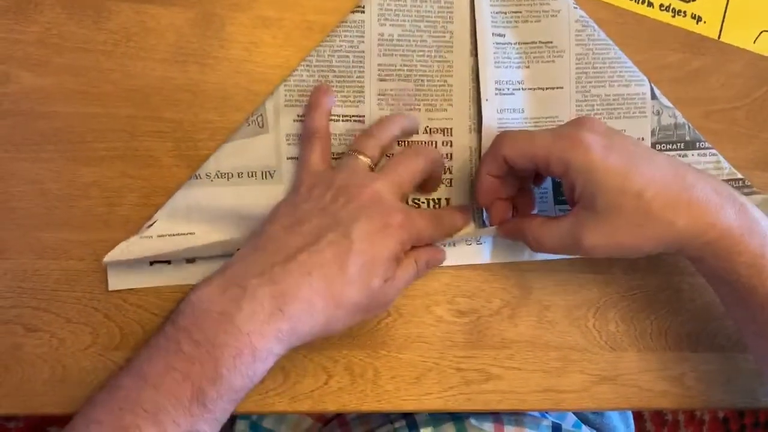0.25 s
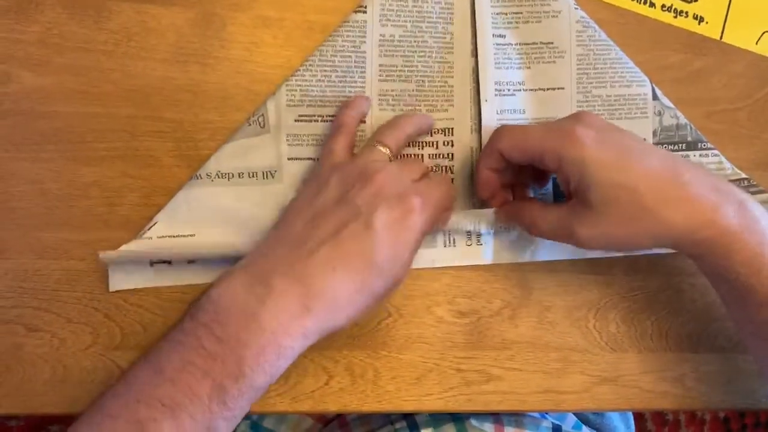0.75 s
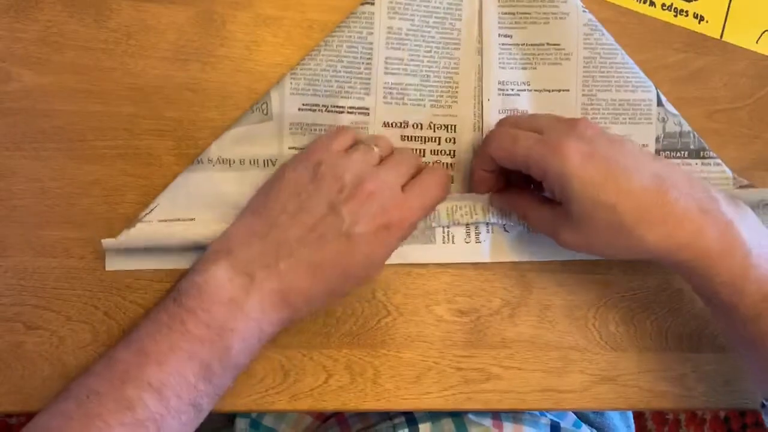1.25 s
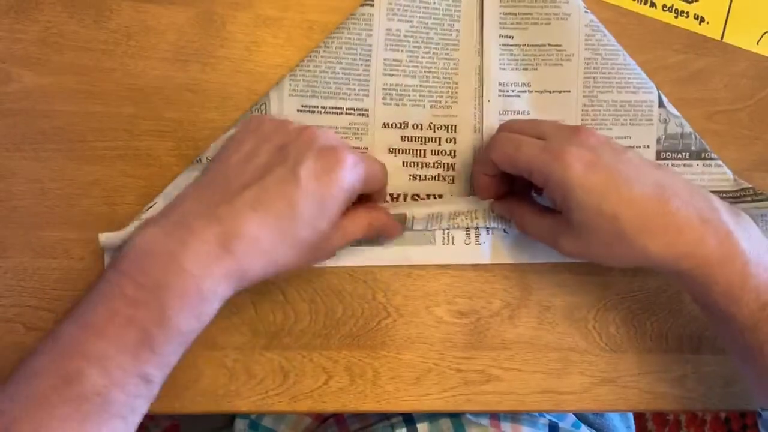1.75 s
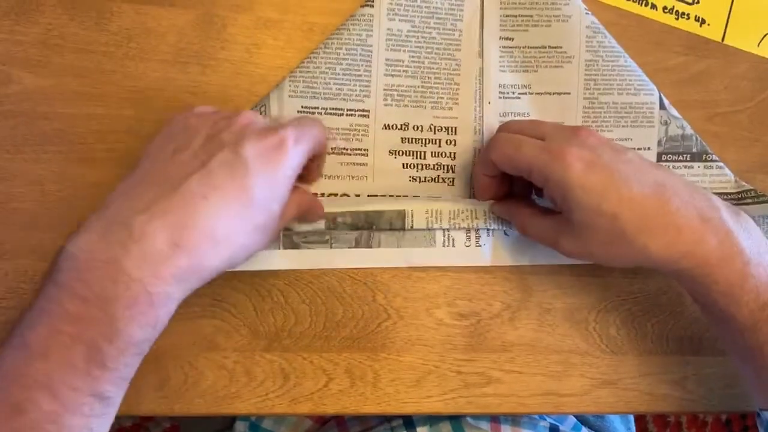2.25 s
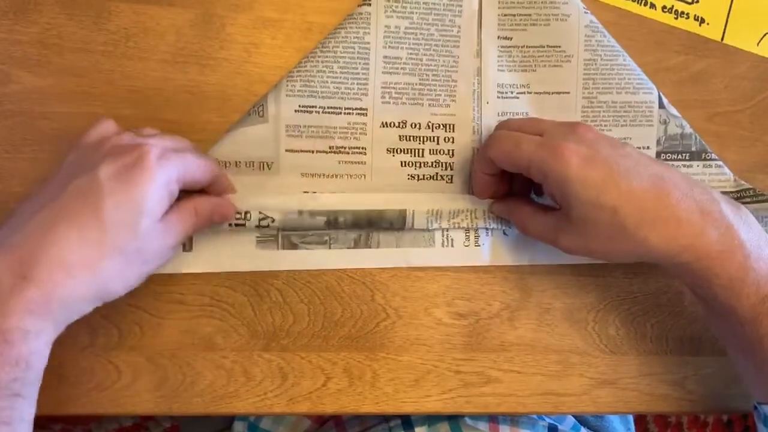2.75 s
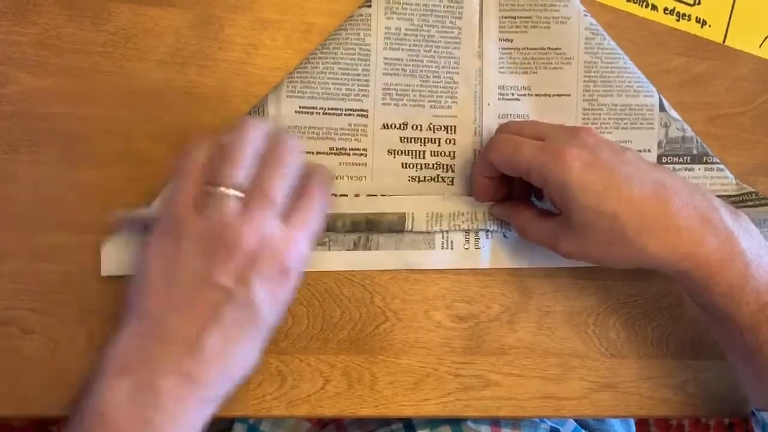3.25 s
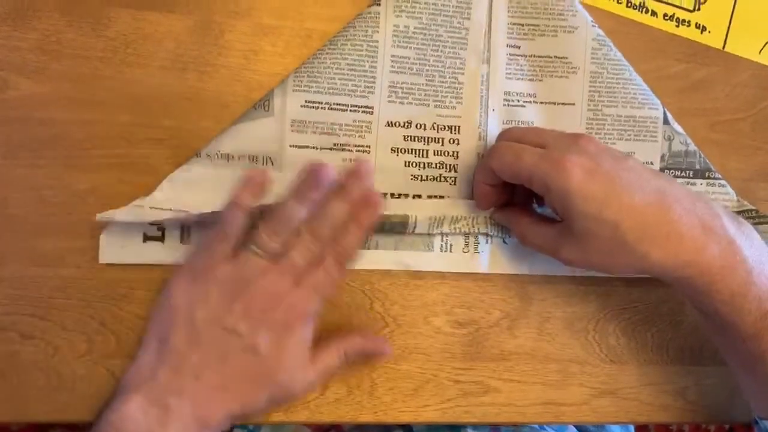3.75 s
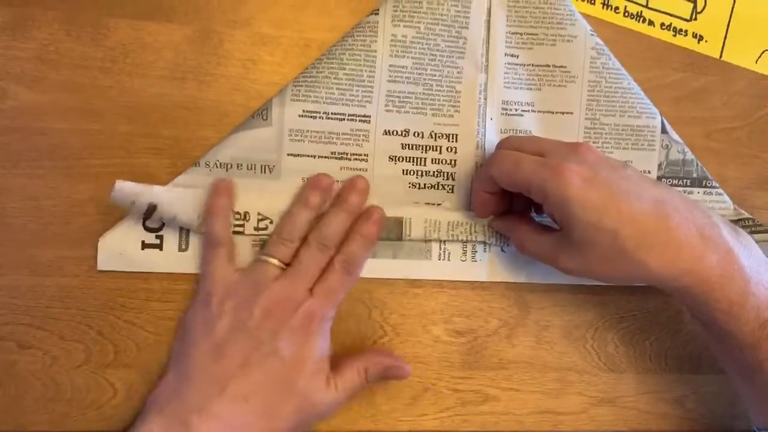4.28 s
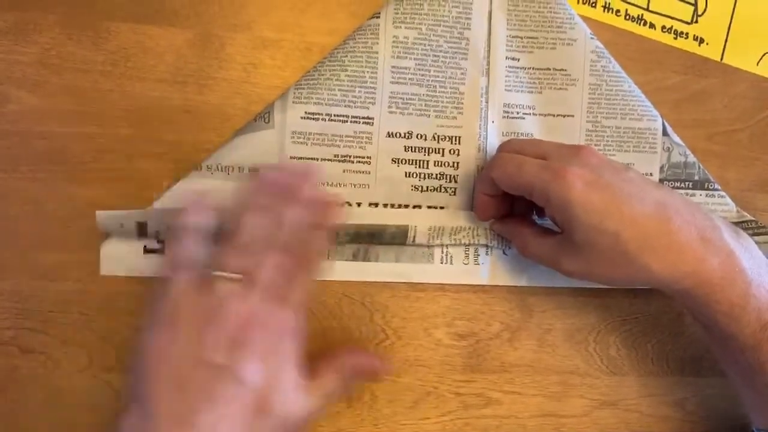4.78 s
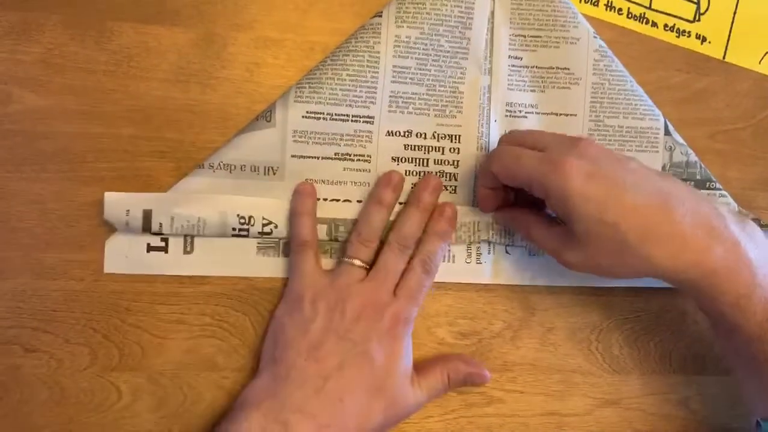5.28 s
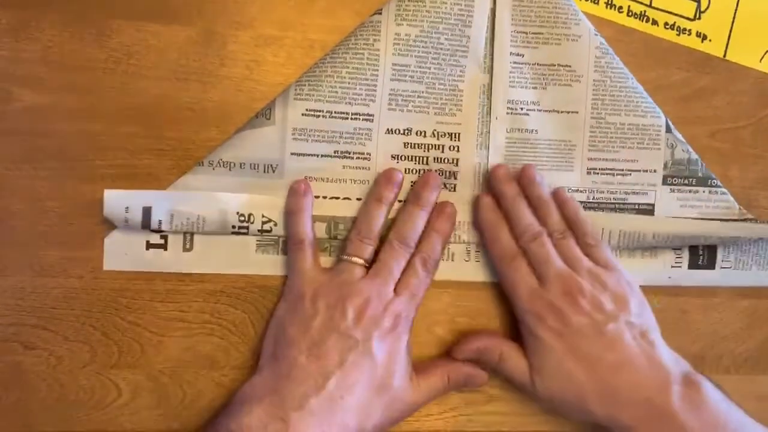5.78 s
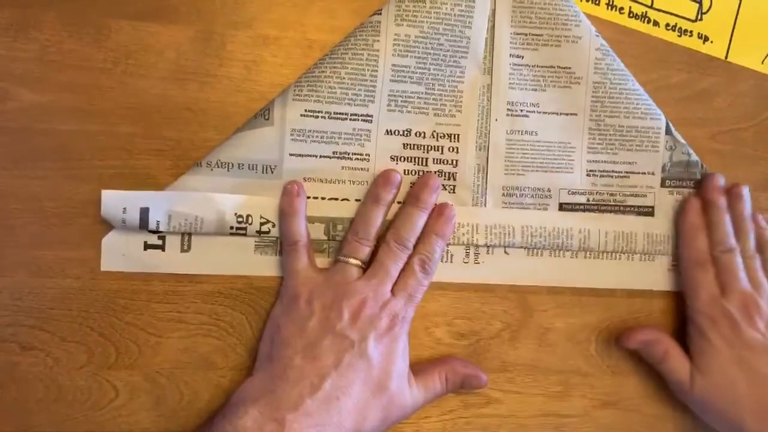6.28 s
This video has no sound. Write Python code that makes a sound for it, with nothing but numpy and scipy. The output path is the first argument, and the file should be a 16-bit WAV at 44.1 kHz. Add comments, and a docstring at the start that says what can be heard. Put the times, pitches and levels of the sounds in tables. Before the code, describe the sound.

Close stereo sound of newsprint being handled in a small quiet room: dry crackles, short fibrous rubs and small hollow papery knocks as an edge is rolled, a brief lull, sharp bright crinkles, then flat-hand swishes as the fold is smoothed. Soft dull bumps come from the tabletop. Beneath everything runs a faint low hum that swells slightly and dips.

```python
"""Folded newspaper: two hands roll up its edge and press it flat on a wooden table.
Buckles are short kinks of noise; sliding is random fibre slips in three bands; folds ring as narrow notes.
Fingers thud on the table. A wavering sine hums and noise gives still air in a small room.
A close microphone pair hears it all with phase, balance and stray differences."""
import sys
import numpy as np
from scipy import signal
from scipy.fft import rfft, irfft, next_fast_len
from scipy.io import wavfile
from scipy.ndimage import uniform_filter1d

SR = 44100
rng = np.random.default_rng(int(sys.argv[2]) if len(sys.argv) > 2 else 0)


def put_to_file(sound):
    """Save the sound as 16-bit audio at rate SR, in the file named by the first command-line argument."""
    columns = np.atleast_2d(sound).T  # one column per channel
    safe = np.clip(columns, -1, 1)
    whole_steps = np.round(safe * 32767)
    wavfile.write(sys.argv[1], SR, whole_steps.astype(np.int16))


N = 287833
TIME = np.arange(N) / SR
SPAN = next_fast_len(N, True)
HZ = np.fft.rfftfreq(SPAN, 1 / SR)

# Single buckles. Each row: time in seconds, level in dB over 4 ms before trim, treble over mids in dB.
SNAPS = [(.147, -47.5, 2), (.224, -43.5, 5), (.291, -50, 12), (0.4682, -39, 16), (.523, -33.5, -2),
         (.53, -40, -1), (.5755, -26, 7), (.591, -35, -1), (.713, -42, -20), (.723, -37, -11),
         (.731, -39, -1), (.755, -35, 2), (.7833, -39, -1), (.8514, -40.5, -5), (0.8869, -34.5, 13),
         (0.9123, -36.5, 0), (.971, -42.5, -1), (.999, -27.5, 4), (1.023, -31.5, 4), (1.0399, -32.5, 3),
         (1.0853, -31.5, -7), (1.0913, -30, 5), (1.2468, -25.5, 10.5), (1.259, -39, 7), (1.3155, -34, -6),
         (1.322, -41, -14), (1.3394, -27.5, -12.5), (1.3688, -30.5, -3), (1.4194, -37, -1),
         (1.503, -41, -3), (1.591, -31.5, -2), (1.616, -40, 10), (1.6862, -30.5, 7.5), (1.7406, -38, -6),
         (1.7827, -31.5, 7), (1.8, -42, 2), (1.894, -42.5, 7), (1.928, -43.5, 4), (1.9731, -40, 3.5),
         (2.0336, -35.5, -11), (2.079, -42, -5), (2.221, -48, 17), (2.2309, -32.5, 7.5),
         (2.2716, -38.5, -3), (2.3162, -28, 6), (2.34, -40, 4), (2.4534, -28.3, 11), (2.581, -45, 7),
         (2.8221, -42, 3), (2.854, -45.5, -1), (2.8936, -47, -13), (2.9229, -44, 4), (3.2511, -40.5, -1),
         (3.269, -41, 5), (3.399, -24.5, 13), (3.4108, -35, -4), (3.461, -26, 9), (3.4928, -31.5, 9),
         (3.625, -38, 0.5), (3.983, -36, 2), (4.0058, -33.5, 10.5), (4.107, -43.5, -3), (4.176, -29.5, 7),
         (4.183, -36.5, 13), (4.272, -41, 14), (4.2844, -38, 8), (4.3375, -35, 15.5), (4.37, -39, 14),
         (4.693, -57, 0), (4.9499, -39, -10), (5.0263, -43.5, -15), (5.055, -43.5, -12),
         (5.1025, -33.5, 3.5), (5.136, -44, 2), (5.2548, -41.5, -5), (5.311, -39, 8), (5.608, -36.5, 5),
         (5.901, -45, -10), (5.933, -41.5, -2), (5.984, -41.5, 3), (6.001, -40.5, 1), (6.019, -40, -7),
         (6.05, -37.5, 1), (6.0596, -39.5, 0), (6.067, -40, 1), (6.087, -39, -4), (6.182, -40.5, 8),
         (6.203, -41.5, 6), (6.2947, -35.5, 13.5), (6.4836, -42, -3), (6.493, -45, 0)]
# Crushed creases. Each row: start in seconds, length in seconds, level in dB, treble over mids in dB.
CRUNCHES = [(2.513, .008, -39, -13), (3.944, .012, -38.5, 4), (4.59, .03, -55, -10), (4.9235, .028, -37, 3),
            (4.95, .014, -40.5, -15), (5.332, .013, -47, 9), (5.579, .005, -37.5, 6)]
# Finger pushes. Each row: start in seconds, length in seconds, rustle in dB before trim,
# fibre hiss in dB re rustle.
PUSHES = [(0, 0.041, -50.5, .5), (0.107, .08, -60.5, 1), (0.199, 0.041, -51.5, 8.5), (.26, .08, -61.5, -1),
          (0.354, 0.12, -51.5, 3.5), (0.477, .075, -48, 3.5), (.568, .066, -43.5, 3),
          (0.688, .11, -52.5, -2.5), (0.851, .1, -53, 0), (0.949, 0.096, -48, 2.5), (1.088, .135, -51.5, 5),
          (1.239, .13, -46.5, .5), (1.393, .075, -53, 1), (1.488, 0.052, -49.5, 2.5),
          (1.584, 0.16, -54, 2.5), (1.74, 0.19, -50.5, .5), (1.994, .3, -52, 4), (2.311, 0.058, -48.5, 3),
          (2.451, 0.079, -55.5, 5), (2.589, 0.15, -55, 3), (2.785, 0.062, -54, 2),
          (2.921, .008, -56.5, 0.5), (2.994, .047, -57.5, 2.5), (3.141, .08, -62, 3.5),
          (3.252, .008, -45.5, 1.5), (3.289, .095, -52.5, 6), (3.401, .11, -48.5, 4),
          (3.593, 0.032, -53.5, 1.5), (5.096, 0.017, -55, 0.5), (5.16, .04, -65, -2), (5.26, 0.022, -54, 0),
          (5.327, .02, -55, 3.5), (6.311, 0.052, -59.5, 1.5), (6.501, .035, -58, 1)]
# Flat-hand sweeps. Each row: start, fastest point and end in seconds, rustle when fastest in dB
# before trim, fibre hiss in dB re rustle.
SWEEPS = [(3.902, 3.945, 3.98, -58, 2.5), (3.98, 4.144, 4.17, -55.5, 6.5), (4.168, 4.278, 4.57, -54, 10.5),
          (4.581, 4.6, 4.82, -67, -0.5), (4.9, 4.95, 5.0, -53, 1), (5.545, 5.58, 5.69, -53.5, 2),
          (5.708, 6.087, 6.29, -50, 3)]
# Loose sheet bending as a hand shifts its hold. Each row: start in seconds, length in seconds,
# level in dB before trim.
BENDS = [(0, 0.08, -53.5), (0.122, 0.11, -60.5), (.438, 0.1, -53), (.69, .16, -54), (1.085, .02, -52),
         (1.89, 0.09, -57), (2.515, .01, -53), (2.937, 0.0092, -60), (3.06, .06, -64.5), (3.47, 0.077, -54),
         (3.94, .06, -58), (4.13, 0.035, -58), (4.945, 0.06, -58), (5.254, .07, -60), (5.56, .05, -64),
         (6.159, 0.05, -56), (6.505, .02, -56)]
# Tube note of the rolled edge. Each row: time in seconds, pitch in Hz, level in dB re driving rustle.
ROLL = [(0, 1450, -4), (1.35, 1480, -1), (2.2, 1600, -16), (4.75, 1850, -8)]
# Closing air pockets. Each row: time in seconds, level in dB, pitch in Hz, t60 in seconds.
POCKETS = [(.755, -55, 566, 0.11), (.853, -55.5, 556, .08), (1.086, -44, 1420, 0.1), (1.34, -45, 1530, .1),
           (2.518, -39, 1017, .018), (3.4, -42.5, 1420, .16), (3.4615, -41.5, 1534, .06)]
# Heavy finger and palm landings. Each row: time in seconds, level in dB before trim.
BUMPS = [(.199, -45.5), (.358, -55), (.426, -54.5), (0.554, -54.5), (.66, -56), (1.09, -56.5), (1.217, -54),
         (2.612, -56.5), (3.253, -56), (3.495, -57), (4.13, -59.5), (4.945, -55), (5.31, -55.5),
         (6.157, -56)]
# Spectral shapes of buckle, slide, table and air. Each row: frequency in Hz, relative density in dB.
SNAP_COLOUR = [(100, -23), (400, -15), (750, -12.5), (1100, -8), (1500, -1), (2300, -4), (3500, 2),
               (5000, 2), (7500, -3.5), (9000, -5.5), (13000, -7.5), (16000, -13)]
SLIDE_COLOUR = [(80, -9.5), (180, -3.5), (320, 2), (500, -6), (780, -4.5), (1100, -2), (1500, -2),
                (2400, 0.5), (3400, 3.5), (5000, -0.5), (7600, -2.5), (8500, -6), (12500, -4.5),
                (16000, -11.5)]
TABLE_COLOUR = [(28, -42.5), (55, -14.5), (85, -1.5), (140, 0.5), (200, -11), (350, -19.5), (700, -36.5),
                (2000, -65.5)]
AIR_COLOUR = [(20, -24), (45, -4), (75, 2.5), (150, -1.5), (280, -9), (420, -22.5), (1000, -27.5),
              (2000, -32.5), (5000, -33.5), (16000, -42.5)]
# Machine tones. Each row: frequency in Hz, level in dB before swell.
HUM = [(108.8, -57)]
# Hum swell. Each row: time in seconds, level change in dB.
HUM_SWELL = [(0, 0), (1.45, -1), (1.7, -10.5), (1.9, 0), (2.9, -3), (3.3, 1.5), (5.7, -1.5), (6.1, 3.5),
             (6.53, 1)]
# Room decay. Each row: frequency in Hz, t60 in seconds.
ROOM_T60 = [(200, 0.6), (800, 0.43), (2000, 0.34), (6000, 0.26), (15000, 0.02)]
# Room echo. Each row: frequency in Hz, level in dB re direct sound.
ROOM_WET = [(150, -11), (500, -.5), (1400, -5.5), (2500, -7.5), (5000, -19), (15000, -22)]
# Microphone phase. Each row: frequency in Hz, lead of left in radians.
PORT_PHASE = [(0, 0), (350, 0), (550, -1.4), (850, -1.7), (1050, .5), (1700, .4), (2600, 1.9), (3400, 1.3),
              (4750, 3.14), (6400, 6.1), (7500, 6.7), (8950, 9.42), (10400, 12.1), (11600, 12.8),
              (12500, 15), (13300, 15.7), (14600, 18.6), (16500, 19.4)]
# Microphone balance. Each row: frequency in Hz, left over right in dB.
PORT_BALANCE = [(100, -0.9), (400, -1), (900, -4), (1700, -1), (2400, -1.5), (3100, 0), (16000, 0)]
# Sound straying between microphones. Each row: frequency in Hz, amplitude share 0-1.
PORT_SPREAD = [(170, .03), (500, .42), (780, .3), (1000, .6), (1500, .15), (2400, .4), (4700, .1),
               (7000, .2)]

# A push grips quickly, eases off, then lets go; the bent sheet settles more slowly.
PUSH_RISE_DB_PER_S, PUSH_SAG_DB_PER_S, PUSH_FALL_DB_PER_S = 600.5, 11.5, 350.5
FLEX_FALL_DB_PER_S = 201
# Flexing re a push of level FLEX_FULL_DB, and its growth in dB per dB of push.
FLEX_RE_RUSTLE_DB, FLEX_FULL_DB, FLEX_GROWTH = -9, -51.5, 0.78
SWEEP_ENDS_DB, SWEEP_FLEX_DB = -4.5, -19  # slower at both ends; pressed paper hardly flexes
PRESSED_EVENS = .8  # smoothing under a flat hand, 0-1
TOUCH_DB = -69.5  # light touch at every push, before trim
AIR_DB = -69.5  # part common to both channels
EDGE_HZ = 15900


def snap(bright_db, rise_s=.0005, ring_s=0.001, flutter=0.5, tail_db=-18, tail_s=0.0077, neutral_db=2,
         facet_hz=(1400, 3800), facet_db=7, facet_width=0.14, size=2048):
    """One buckle: the sheet starts to give, kinks sharply, and a facet by the kink favours its own band."""
    t = np.arange(size) / SR - rise_s
    hz = np.fft.rfftfreq(size, 1 / SR)
    dying = np.exp(-abs(t) / ring_s) + gain_of(tail_db) * np.exp(-abs(t) / tail_s)
    onset = np.minimum(1 + t / rise_s, 1) ** 2
    kink = flutter * rng.standard_normal(size) * dying * onset
    kink[np.argmin(abs(t))] += rng.choice([-1, 1])
    tilt = read([(1900, -0.55), (9500, 0.55)], hz)
    pitch_hz = facet_hz[0] * (facet_hz[1] / facet_hz[0]) ** rng.random()
    facet = facet_db / (1 + ((hz / pitch_hz - 1) / facet_width) ** 2)
    colour_db = read(SNAP_COLOUR, hz) + (bright_db - neutral_db) * tilt + facet
    sound = irfft(rfft(kink) * causal(colour_db))
    return sound / np.sqrt(np.sum(sound ** 2) / (.004 * SR))  # energy of rms 1 over 4 ms


def snaps(level_db=-0.1, lead_s=.0005):
    """Buckles that stand out from the rustle, one by one."""
    out = np.zeros(N)
    for s, db, bright_db in SNAPS:
        add(out, s - lead_s, gain_of(db + level_db) * snap(bright_db))
    return out


def crunches(kinks_per_s=900, spread_db=4, level_db=0.0, lead_s=.0003):
    """A crease is crushed: kinks give way in close succession."""
    out = np.zeros(N)
    for start, length_s, db, bright_db in CRUNCHES:
        kinks = max(round(length_s * kinks_per_s), 2)
        burst = np.zeros(round(length_s * SR) + 2048)
        for k, (late, strength) in enumerate(rng.random((kinks, 2))):
            kink = gain_of(spread_db * (2 * strength - 1)) * snap(bright_db)
            add(burst, (k + late) * length_s / kinks, kink)
        rms = np.sqrt(np.sum(burst ** 2) / (length_s * SR))
        add(out, start - lead_s, gain_of(db + level_db) * burst / rms)
    return out


def gesture(start, length_s, fall_db_per_s):
    """Level in dB of one finger movement: attack, sagging hold, release."""
    t = TIME - start
    attack = PUSH_RISE_DB_PER_S * np.minimum(t, 0)
    sag = PUSH_SAG_DB_PER_S * np.clip(t, 0, length_s)
    return attack - sag - fall_db_per_s * np.maximum(t - length_s, 0)


def pressed():
    """Smoothing at every instant: 0 for loose paper, PRESSED_EVENS under a flat hand."""
    under_hand = sum((TIME > start) & (TIME < end) for start, _, end, _, _ in SWEEPS)
    return np.clip(PRESSED_EVENS * uniform_filter1d(under_hand.astype(float), size=1024), 0, 1)


def slide_levels(rest_db=-91):
    """Levels in dB of flexing, rustle and hiss at every instant: the strongest movement leads."""
    flex, rustle, hiss = np.full((3, N), float(rest_db))
    for start, length_s, db, hiss_db in PUSHES:
        push = db + gesture(start, length_s, PUSH_FALL_DB_PER_S)
        bend_db = FLEX_FULL_DB + FLEX_RE_RUSTLE_DB + FLEX_GROWTH * (db - FLEX_FULL_DB)
        flex = np.maximum(flex, bend_db + gesture(start, length_s, FLEX_FALL_DB_PER_S))
        rustle = np.maximum(rustle, push)
        hiss = np.maximum(hiss, push + hiss_db)
    for start, fastest, end, db, hiss_db in SWEEPS:
        rise = PUSH_RISE_DB_PER_S * np.minimum(TIME - start, 0)
        fall = PUSH_FALL_DB_PER_S * np.maximum(TIME - end, 0)
        speed_db = np.interp(TIME, [start, fastest, end], [SWEEP_ENDS_DB, 0, SWEEP_ENDS_DB])
        sweep = db + speed_db + rise - fall
        flex = np.maximum(flex, sweep + SWEEP_FLEX_DB)
        rustle = np.maximum(rustle, sweep)
        hiss = np.maximum(hiss, sweep + hiss_db)
    for start, length_s, db in BENDS:
        flex = np.maximum(flex, db + gesture(start, length_s, FLEX_FALL_DB_PER_S))
    return flex, rustle, hiss


def slide(levels, flex_db=-4.5, rustle_db=-4.3, hiss_db=-2.8, slips_per_s=4000, spread_db=3.5,
          judder_db=2.0, patchy_db=(2.3, 1.6, 1.1), ripple_db=3.5):
    """Fibres catch and slip thousands of times a second, unequally hard, and shake the sheet."""
    struck = rng.random(N) < slips_per_s / SR
    strength_db = spread_db * np.minimum(rng.exponential(1, N), 4)
    slips = struck * rng.choice([-1, 1], N) * gain_of(strength_db)
    loose = 1 - pressed()  # under a flat hand the slips merge into an even swish
    rough = loose * evened(slips + 0.25 * rng.standard_normal(N))
    swish = np.sqrt(1 - loose ** 2) * rng.standard_normal(N)
    drive = (rough + swish) * gain_of(judder_db * loose * wander(70))
    spectrum = rfft(rippled(drive, ripple_db), SPAN) * gain_of(read(SLIDE_COLOUR, HZ))
    above_flex = read([(800, 0.029), (1450, 0.97)], HZ)
    above_rustle = read([(3600, 0.08), (6000, 0.93)], HZ)
    shares = 1 - above_flex, above_flex - above_rustle, above_rustle
    out = np.zeros(N)
    for share, level, db, uneven_db in zip(shares, levels, (flex_db, rustle_db, hiss_db), patchy_db):
        band = evened(irfft(spectrum * share, SPAN)[:N])
        out += band * gain_of(level + db + uneven_db * loose * wander(31))
    return out


def rippled(x, depth_db, size=(10, 3)):
    """The bending sheet and moving hands favour some pitches for a few hundredths of a second."""
    z = signal.stft(x, nperseg=512)[2]
    patches = uniform_filter1d(rng.standard_normal(z.shape), size[0], axis=1)
    patches = uniform_filter1d(patches, size[1], axis=0)
    return signal.istft(z * evened(gain_of(depth_db * evened(patches))), nperseg=512)[1][:N]


def crinkle(level, level_db=-2.5, spread_db=3.2, bright_db=0, variety_db=8, pressed_db=-9.5, count=520):
    """Small wrinkles tick at uneven intervals, following the rustle, more softly under a flat hand."""
    out = np.zeros(N)
    level = level + pressed_db * pressed()
    for k in range(count):
        at = int((k + rng.random()) * N / count)
        db = level[at] + level_db + spread_db * min(rng.exponential(), 2.4)
        tick = snap(bright_db + variety_db * rng.standard_normal(), ring_s=.0006, size=1024)
        add(out, at / SR, gain_of(db) * tick)
    return out


def hollow(x, width_hz=170, drift=.04):
    """The rolled edge is a tube kept ringing by the rustle: a resonator with moving pitch and level."""
    s, hz, db = np.transpose(ROLL)
    pitch_hz = np.interp(TIME, s, hz) * (1 + drift * wander(6))
    turn = np.exp(2j * np.pi * np.cumsum(pitch_hz) / SR)
    r = np.exp(-np.pi * width_hz / SR)
    ring = 2 * (turn * signal.lfilter([1 - r], [1, -r], x / turn)).real
    return gain_of(np.interp(TIME, s, db)) * ring


def flaps(flex, level_db=2.6, spread_db=4.5, pitch_hz=(230, 950), ring_s=.006, count=420, size=2048):
    """Panels of the bending sheet flip over with short papery knocks, each at its own pitch."""
    out, t = np.zeros(N), np.arange(size) / SR
    for k, (late, place, strength) in enumerate(rng.random((count, 3))):
        at = int((k + late) * N / count)
        hz = pitch_hz[0] * (pitch_hz[1] / pitch_hz[0]) ** place
        knock = np.sin(2 * np.pi * hz * t) * np.exp(-t / ring_s)
        add(out, at / SR, gain_of(flex[at] + level_db + spread_db * (2 * strength - 1)) * knock)
    return out


def pockets(width=0.28, level_db=0.0, knock_db=8, knock_s=.0016, size=16384):
    """A closing fold knocks, and the air squeezed from it gives a short hollow note."""
    out, t, hz = np.zeros(N), np.arange(size) / SR, np.fft.rfftfreq(size, 1 / SR)
    for s, db, pitch_hz, t60_s in POCKETS:
        resonance = 1 + ((hz / pitch_hz - 1) / width * 2) ** 2
        ring = evened(irfft(rfft(rng.standard_normal(size)) / resonance))
        knock = np.sin(2 * np.pi * pitch_hz * t) * np.exp(-t / knock_s)
        add(out, s, gain_of(db + knock_db) * knock + ring * gain_of(db + level_db - 60 * t / t60_s))
    return out


def bumps(rise_s=0.013, level_db=-.8, size=16384):
    """Soft flesh pushes the table top, which answers with a dull thud."""
    out, t = np.zeros(N), np.arange(size) / SR
    for s, db in BUMPS + [(push[0], TOUCH_DB) for push in PUSHES]:
        thud = coloured(rng.standard_normal(size), TABLE_COLOUR) * t * np.exp(-t / rise_s)
        add(out, s, gain_of(db + level_db) * thud / np.std(thud[:size // 8]))
    return out


def hum(waver_db=1.4, drift=.006):
    """A motor drones: sines that waver in pitch and level under a slow swell."""
    swell_db = np.interp(TIME, *np.transpose(HUM_SWELL))
    out = np.zeros(N)
    for hz, db in HUM:
        turns = np.cumsum(hz * (1 + drift * wander(4.9))) / SR
        level = gain_of(db + swell_db + waver_db * wander(8.7))
        out += np.sqrt(2) * level * np.sin(2 * np.pi * turns)
    return out


def still_air():
    """Steady coloured noise, mostly common to both channels."""
    shared, left, right = (coloured(rng.standard_normal(N), AIR_COLOUR) for _ in range(3))
    return gain_of(AIR_DB) * (shared + 0.43 * np.array([left, right]))


def room(x, gap_s=.004):
    """Sparse echoes, different at each microphone, each band dying at its own speed."""
    taps = rng.standard_normal((2, SR)) * (rng.random((2, SR)) < .08) * (TIME[:SR] > gap_s)
    hz, t, z = signal.stft(taps, SR, nperseg=256)
    t60_s = read(ROOM_T60, hz)
    z = z * gain_of(-60 * t / t60_s[:, None])
    whole = np.sqrt(np.sum(taps ** 2) / 2 * t60_s / np.log(1e6))  # size of each band's tail
    wet = gain_of(read(ROOM_WET, hz)) / whole
    tail = signal.istft(z * wet[:, None], SR, nperseg=256)[1]
    return signal.fftconvolve(x[None], tail, axes=1)[:, :N]


def ports(pair):
    """Phase and balance differ by frequency between microphones; a wavering part strays in antiphase."""
    lag = np.exp(-1j * np.interp(HZ, *np.transpose(PORT_PHASE)))
    lean = gain_of(read(PORT_BALANCE, HZ) / 2)
    spectrum = rfft(pair, SPAN)
    spread = np.clip(read(PORT_SPREAD, HZ), 0, 1)
    part = signal.hilbert(irfft(spectrum.mean(0) * spread, SPAN))[:N]
    stray = rfft((part * wander(60)).imag, SPAN)
    spectrum = spectrum * np.sqrt(1 - spread ** 2) + np.array([stray, -stray])
    return irfft(spectrum * np.array([lean, lag / lean]), SPAN)[:, :N]


def gain_of(db):
    """Decibels to amplitude."""
    return 10 ** (np.asarray(db) / 20)


def evened(x):
    """Scales to rms 1."""
    return x / np.sqrt(np.mean(x ** 2) + 1e-20)


def read(points, hz):
    """Reads a table along a log-frequency axis."""
    f, value = np.transpose(points)
    return np.interp(np.log(hz + 1), np.log(f + 1), value)


def add(mix, s, sound):
    """Mixes a sound in at time s in seconds."""
    part = mix[max(round(s * SR), 0):][:len(sound)]
    part += sound[:len(part)]


def coloured(x, points):
    """Filters x by a table of dB, at rms 1."""
    size = next_fast_len(len(x), True)
    gain = gain_of(read(points, np.fft.rfftfreq(size, 1 / SR)))
    return evened(irfft(rfft(x, size) * gain, size)[:len(x)])


def causal(db):
    """Minimum-phase spectrum of the given gain: abrupt start, then decay."""
    log_gain = np.log(gain_of(np.r_[db, db[-2:0:-1]]))
    return np.exp(np.conj(signal.hilbert(log_gain)))[:len(db)]


def wander(rate_hz):
    """Slow random signal of rms 1."""
    t = TIME[::32]
    lowpass = np.exp(-(np.fft.rfftfreq(len(t), t[1]) / rate_hz) ** 2)
    slow = irfft(rfft(rng.standard_normal(len(t))) * lowpass, len(t))
    return np.interp(TIME, t, evened(slow))


def scene():
    """Paper and table in the room, over the hum and still air."""
    flex, rustle, hiss = slide_levels()
    moving = slide((flex, rustle, hiss)) + crinkle(rustle)
    paper = snaps() + crunches() + moving + hollow(moving) + flaps(flex) + pockets()
    near = paper + bumps()
    return ports(near + room(near) + hum() + still_air())


def record(dry):
    """The recorder's band limit: a linear-phase low-pass."""
    lowpass = signal.firwin(255, EDGE_HZ, window=("kaiser", 9), fs=SR)
    return signal.oaconvolve(dry, lowpass[None], "same")


dry = scene()
out = record(dry)
put_to_file(out)
```